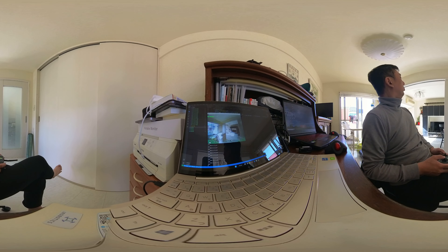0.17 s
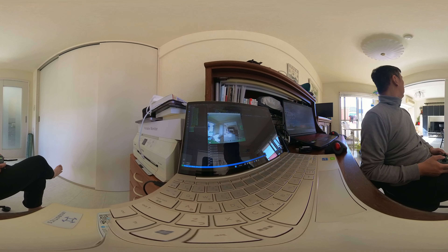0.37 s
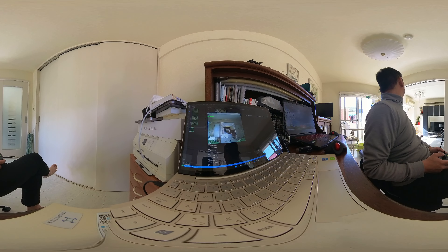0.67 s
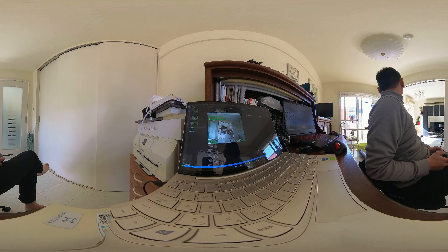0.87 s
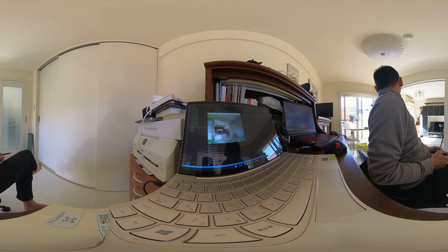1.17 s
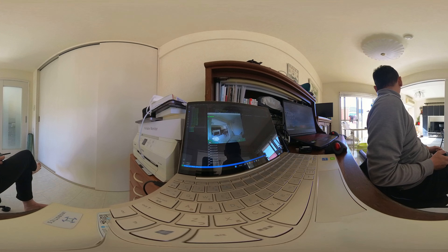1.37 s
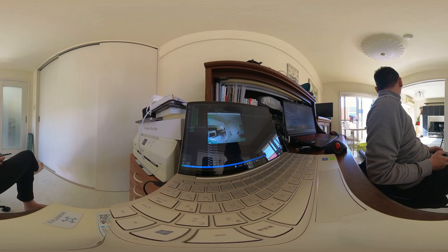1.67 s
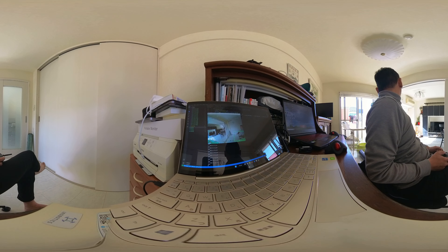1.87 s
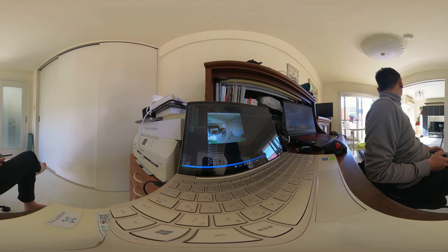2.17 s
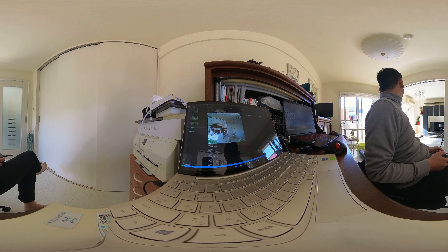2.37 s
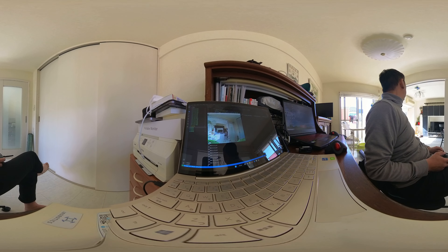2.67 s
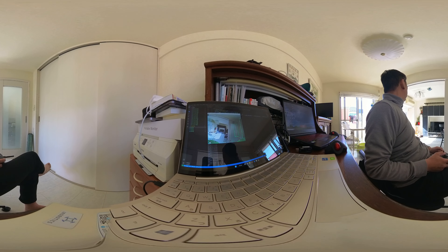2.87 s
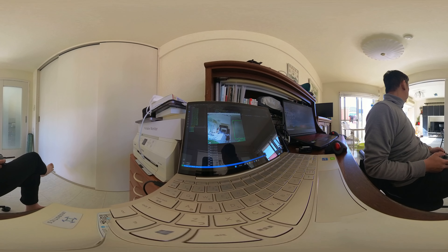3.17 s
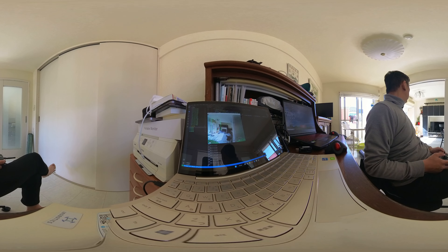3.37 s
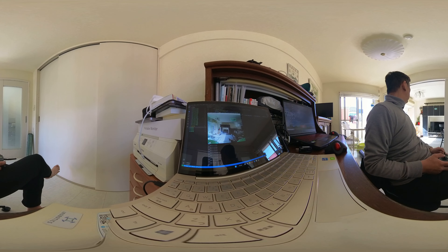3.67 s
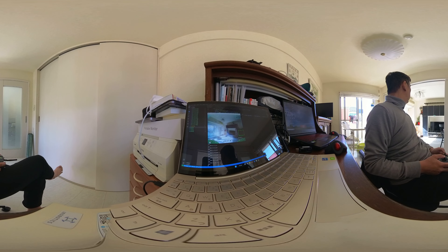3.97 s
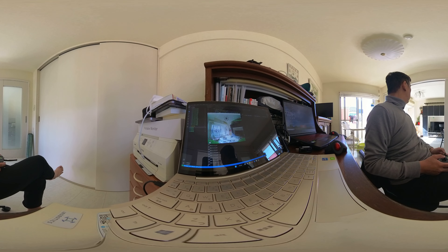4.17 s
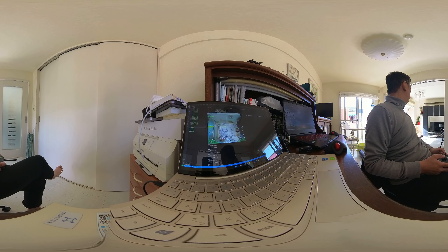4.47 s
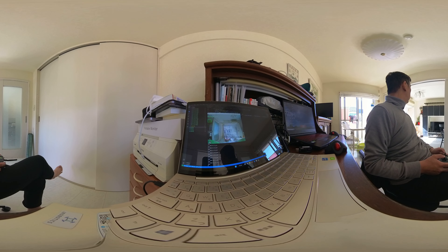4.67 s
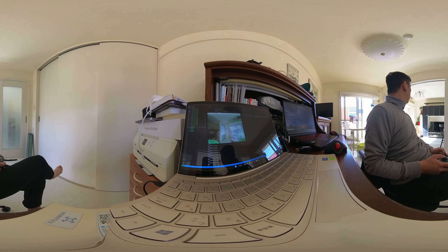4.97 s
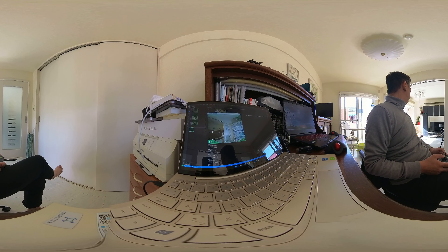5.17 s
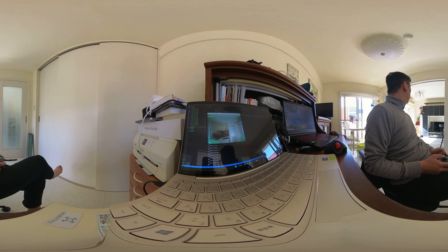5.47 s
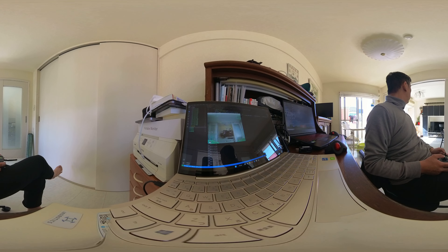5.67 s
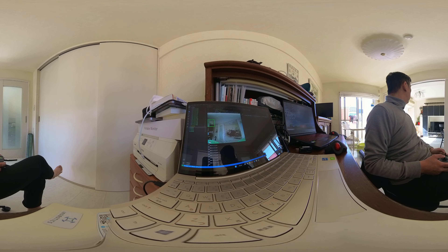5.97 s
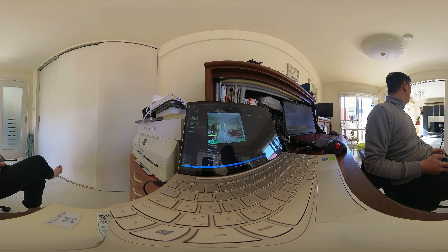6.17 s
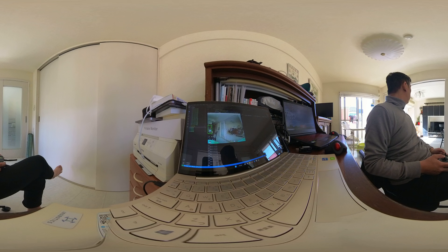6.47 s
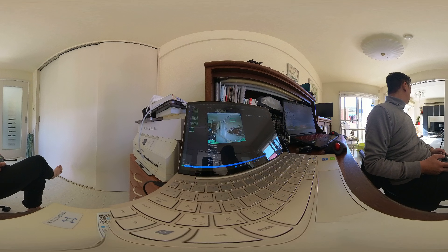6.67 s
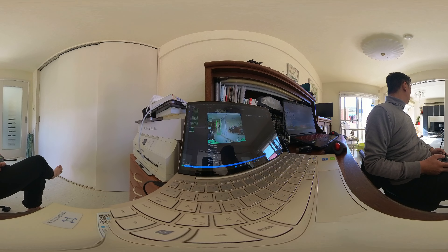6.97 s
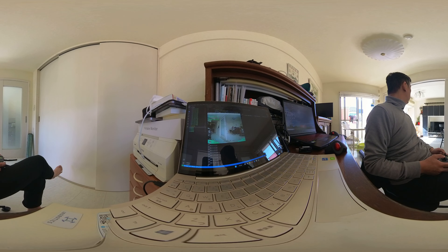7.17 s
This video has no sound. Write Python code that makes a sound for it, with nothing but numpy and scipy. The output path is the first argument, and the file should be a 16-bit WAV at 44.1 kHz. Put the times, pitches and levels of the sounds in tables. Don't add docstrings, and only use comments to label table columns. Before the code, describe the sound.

In a furnished room, a tiny drone flies continuously, four rotors singing slightly different high notes that beat and waver with the throttle. Bright propeller hiss surrounds the whine. One low puff of air hits the right side early on. The drone drifts away and fades, then edges closer. A stereo microphone on the desk also catches very faint soft bumps, short room echoes and low rumble.

```python
import sys
import numpy as np
from scipy import signal
from scipy.fft import rfft, irfft
from scipy.io import wavfile
from scipy.ndimage import uniform_filter1d

SR = 44100
rng = np.random.default_rng(int(sys.argv[2]) if len(sys.argv) > 2 else 0)


def wrap_up_sound(samples):
    columns = np.atleast_2d(samples).T
    tamed = np.clip(columns, -1, 1)
    steps = np.round(tamed * 32767).astype(np.int16)
    wavfile.write(sys.argv[1], SR, steps)


def gain_from_db(level_db):
    decades = np.asarray(level_db, float) / 20
    return 10 ** decades


N = 322812

BLADES = 3
HISS_DB = -5.5
# frequency in Hz, likeness from 0 to 1.
LIKENESS = [(60, 0.97), (200, 0.14), (450, 0.93), (1000, 0.7), (2000, 0.31), (3300, 0.033), (5000, 0.18),
            (6500, 0.17)]


def in_time(rows):
    seconds, *columns = np.transpose(rows)
    return np.array([np.interp(np.arange(N) / SR, seconds, column) for column in columns])


def at_hz(points, hz):
    point_hz, value = np.transpose(points)
    return np.interp(np.log(hz), np.log(point_hz), value)


def drift(rate_hz, count):
    step = 40
    r = np.exp(-2 * step * np.pi * rate_hz / SR)
    noise = rng.standard_normal((count, N // step + 2002))
    slow = signal.lfilter([1], [1, -2 * r, r * r], noise)[:, 2000:]
    slow = slow / slow.std(axis=1, keepdims=True)
    return np.array([np.interp(np.arange(N) / step, np.arange(len(s)), s) for s in slow])


def rotors(near_db):
    # start in seconds, pitch in Hz.
    throttle = [(0.0, 1526), (0.5, 1501), (0.73, 1368), (0.97, 1369), (1.2, 1548), (1.37, 1604),
                (1.69, 1580), (1.89, 1440), (2.56, 1500), (3.18, 1455), (3.4, 1368), (3.7, 1390),
                (4.21, 1563), (5.18, 1495), (5.45, 1377), (5.83, 1376), (6.26, 1487), (7.3, 1530)]
    # start in seconds, change in Hz.
    nose_down = [(0.0, 153), (0.18, 110), (0.29, 136), (1.36, 85), (1.52, 86), (1.64, 55), (2.55, 25),
                 (3.0, 36), (3.28, 77), (3.6, 45), (3.76, -15), (3.9, -18), (4.07, 3), (4.92, 26),
                 (6.01, 72.5), (6.11, 136), (6.46, 67), (7.299, 75)]
    # start in seconds, change in Hz.
    roll = [(0.0, 34), (0.17, 47.3), (0.829, 37.6), (1.24, 57), (1.83, 13.2), (2.73, 43), (2.82, 13.9),
            (3.38, 33.5), (3.55, 63), (3.6, 60), (3.69, 76.2), (3.85, 88.4), (4.09, 61), (4.23, 31.6),
            (6.31, 28.6), (6.6, 14.6), (6.99, 9.8), (7.301, 15)]
    # start in seconds, change in Hz.
    yaw = [(0.0, -16), (0.79, 35), (1.09, 28), (1.59, -6), (1.82, 1), (1.89, -21), (2.118, 11), (2.37, 7),
           (3.03, 31), (3.18, 3), (3.66, -8), (4.21, 28), (4.63, -12), (5.12, -23), (5.33, -0.5),
           (5.41, -22), (6.93, 1), (7.3, -3)]
    mixer = [
        [1, 1, 1, 1],
        [1, 1, -1, -1],
        [1, -1, 1, -1],
        [1, -1, -1, 1],
    ]
    commands = np.concatenate([in_time(c) for c in (throttle, nose_down, roll, yaw)])
    spin_up_s = .06
    commands = uniform_filter1d(commands, round(spin_up_s * SR), axis=1, mode="nearest")
    shaft_hz = np.array(mixer) @ commands / BLADES + 2.0 * drift(11.96, count=4)
    turns = np.cumsum(shaft_hz, axis=1) / SR + rng.random((4, 1))
    out = blade_tone(turns, near_db) + octave(turns, near_db)
    return out + twelfth(turns, shaft_hz, near_db) + unbalance(turns, shaft_hz, near_db)


def blade_tone(turns, near_db):
    mean_db = [
        [-55],
        [-55],
        [-55.5],
        [-53.5],
    ]
    # middle in seconds, gain in dB,
    # half length in seconds.
    lobes = [
        [(0.0, 10.5, 0.18), (1.24, 4.5, 0.046), (2.4, 5, 0.08), (2.72, -8, 0.089), (4.0, 9, 0.089),
         (4.68, -14, 0.13), (4.96, 3, 0.045), (6.8, -12, 0.084)],
        [(2.16, -7, 0.17), (2.92, -15, 0.057), (3.48, -10, 0.085), (4.64, 4.5, 0.12), (4.92, -14, 0.067),
         (5.36, -10, 0.051), (7.12, -10, 0.034)],
        [(0.0, -12, 0.066), (0.76, -2.5, 0.26), (2.32, 6, 0.05), (3.0, 6.5, 0.3), (4.08, 3, 0.31),
         (4.96, 12, 0.04), (5.96, -7, 0.22), (6.76, -12, 0.12)],
        [(0.28, -10, 0.42), (1.56, 5.5, 0.17), (2.76, -12, 0.054), (3.28, -9, 0.43), (5.0, 5, 0.047),
         (6.76, 7, 0.077), (7.04, -12, 0.08)],
    ]
    level_db = beam(mean_db, 1.1, lobes, near_db)
    return tone(BLADES * turns, 1140, level_db, flutter_db=3.0, blur=0.19)


def octave(turns, near_db):
    mean_db = [
        [-57],
        [-56],
        [-54.5],
        [-53],
    ]
    # middle in seconds, gain in dB,
    # half length in seconds.
    lobes = [
        [(0.08, 3, 0.08), (2.56, -5, 0.42), (2.88, 4.5, 0.089), (4.84, -8, 0.05), (5.68, 10, 0.079),
         (6.24, 6, 0.18), (6.8, -14, 0.081), (7.12, 9, 0.098)],
        [(0.44, 11.5, 0.12), (2.08, -9, 0.27), (2.12, 13, 0.05), (2.64, 11, 0.05), (2.88, -5, 0.082),
         (4.52, 8.5, 0.12), (4.92, -9, 0.049), (5.68, -14, 0.18), (6.72, 5.5, 0.26), (7.16, -14, 0.041)],
        [(0.0, 7.5, 0.053), (0.64, -10, 0.046), (2.88, 5.5, 0.31), (4.08, 8, 0.06), (4.68, -15, 0.05),
         (5.24, -6, 0.1), (7.32, -4, 0.12)],
        [(0.2, -9, 0.18), (1.8, -5, 0.18), (4.84, 4.5, 0.19), (6.76, 13, 0.079), (7.0, -6, 0.089)],
    ]
    level_db = beam(mean_db, 1, lobes, near_db)
    return tone(2 * BLADES * turns, 3000, level_db, flutter_db=3.0, blur=.8)


def twelfth(turns, shaft_hz, near_db):
    mean_db = [
        [-62.0],
        [-58],
        [-60.5],
        [-58.5],
    ]
    # middle in seconds, gain in dB,
    # half length in seconds.
    lobes = [
        [(0.12, 8, 0.27), (6.48, 11, 0.12)],
        [(0.28, 9, 0.12), (0.84, -13, 0.16), (4.08, 10, 0.12), (6.88, 5, 0.18)],
        [(3.12, 7, 0.41), (4.08, 9.5, 0.16), (4.92, 6, 0.056), (5.52, -5, 0.27), (7.12, 11, 0.13)],
        [(0.52, -2, 0.4), (2.36, 3, 0.12), (3.96, 7, 0.14), (5.04, 5, 0.11), (6.72, 7, 0.12)],
    ]
    notch_hz, notch_width_hz = 3750, 260
    notch_db = -9 * np.exp(-((3 * BLADES * shaft_hz - notch_hz) / notch_width_hz) ** 2)
    level_db = beam(mean_db, 0.66, lobes, near_db) + notch_db
    return tone(3 * BLADES * turns, 4500, level_db, flutter_db=3.5, blur=1.1)


def unbalance(turns, shaft_hz, near_db):
    # multiple of shaft speed, level in dB when the hiss is at the reference.
    weak = [(1, -70.5), (2, -73.5)]
    chipped_db = [
        [1],
        [-1],
        [-2],
        [-5],
    ]
    frame_hz, frame_width_hz = 503, 55
    reference_db = -44
    ring_db = -10 * np.log10(1 + ((shaft_hz - frame_hz) / frame_width_hz) ** 4)
    out = 0
    for multiple, db in weak:
        swell_db = 2.0 * drift(1.2, count=4)
        if multiple == 1:
            swell_db = swell_db + ring_db + chipped_db
        level_db = db + near_db + HISS_DB - reference_db + swell_db
        out = out + tone(multiple * turns, 500 * multiple, level_db, flutter_db=1.5, blur=.15)
    return out


def beam(mean_db, follows, lobes, near_db):
    t = np.arange(0, N, 100) / SR
    swells = []
    for rotor in lobes:
        swell = sum(db * np.exp(-.5 * ((t - s) / width) ** 2) for s, db, width in rotor)
        swells.append(np.interp(np.arange(N) / SR, t, swell))
    usual_near_db = -39
    distance_db = follows * (near_db - usual_near_db)
    fading_db = 1.5 * drift(3.0, count=4)
    return mean_db + distance_db + fading_db + np.array(swells)


def tone(cycles, hz, level_db, flutter_db, blur):
    phase = 2 * np.pi * cycles + blur * drift(20.2, count=4)
    mid = gain_from_db(flutter_db * drift(20.7, count=4)) * np.sin(phase)
    alike = np.clip(at_hz(LIKENESS, hz), 0, 1)
    a, b = drift(4.5, count=4), drift(3.7, count=4)
    side = np.sqrt((1 - alike) / (1 + alike) / 2) * (a * np.sin(phase) + b * np.cos(phase))
    gain = np.sqrt(2) * gain_from_db(level_db)
    mid, side = np.sum(gain * mid, axis=0), np.sum(gain * side, axis=0)
    return np.array([mid + side, mid - side])


def hiss(level_db, top_db, low_db):
    # frequency in Hz, level in dB per Hz.
    colour = [(290, -28), (480, -14.5), (620, -16), (760, -17), (1050, -12.5), (1900, -7.5), (2900, -3.5),
              (3600, -3.5), (4500, -1), (6500, -2.5), (11300, -0.5), (12600, -8.5), (14000, -15),
              (15500, -23)]
    hz, pair = coloured(colour)
    scale = np.sqrt(np.mean(irfft(pair * ((hz > 5200) & (hz < 7000)), N) ** 2))
    centres = np.arange(7.5, 14.5, .5)
    together, own = drift(28.0, count=1), drift(16.0, count=len(centres))
    out = 0
    for centre, gust in zip(centres, own):
        band = np.clip(1 - 2 * abs(np.log2(hz) - centre), 0, 1)
        dulled = np.clip(2 * (centre - 12.5), 0, 1) * (top_db - top_db.mean())
        thinned = np.clip(10.5 - centre, 0, 1) * (low_db - low_db.mean() + 1.6 * gust)
        gusting = 0.27 * together + 0.45 * gust
        out = out + gain_from_db(level_db + dulled + thinned + gusting) * irfft(pair * band, N)
    return out / scale


def coloured(spectrum):
    hz = np.fft.rfftfreq(N, 1 / SR) + 1
    mid, side = rfft(rng.standard_normal((2, N)))
    alike = np.clip(at_hz(LIKENESS, hz), 0, 1)
    pair = np.sqrt(1 + alike) * mid + np.sqrt(1 - alike) * side * [[1], [-1]]
    return hz, gain_from_db(at_hz(spectrum, hz)) * pair


def puff():
    # start in seconds, peak in dB, swing in Hz, rise in seconds.
    gulps = [
        (.8035, -30, 62, .017),
        (.8362, -27, 106.4, 0.005),
    ]
    return swings(gulps, sharp=1.8) * gain_from_db(np.array([[-32.0], [0]]))


def bumps():
    # start in seconds, peak in dB.
    knocks = [(.03, -57), (.31, -60), (.62, -58), (4.26, -59), (4.601, -60), (6.24, -58), (6.801, -61),
              (7.169, -57)]
    return swings([(s, db, 55, .018) for s, db in knocks], sharp=1.1)


def swings(rows, sharp):
    t, out = np.arange(N) / SR, 0
    for s, db, hz, rise_s in rows:
        age = np.clip(t - s, 0, 1) / rise_s
        swell = (age * np.exp(1 - age)) ** sharp
        out = out - gain_from_db(db) * swell * np.sin(2 * np.pi * hz * (t - s))
    return out


def rumble():
    # frequency in Hz, level in dB per Hz.
    colour = [(12, -30), (20, -12), (49, -1), (65, -2), (81, -7), (113, -0.5), (221, -19.5), (330, -18.5),
              (430, -55), (730, -120)]
    hz, pair = coloured(colour)
    noise = irfft(pair * (hz < 500), N)
    return gain_from_db(-70 + 3.0 * drift(5.2, count=1)) * noise / noise.std()


def room(x):
    t60_s, echo_db = .35, -9
    t = np.arange(round(t60_s * SR)) / SR
    tail = rng.standard_normal((2, len(t))) * gain_from_db(-60 * t / t60_s) * (t > .006)
    tail = tail / np.sqrt(np.sum(tail ** 2, axis=1, keepdims=True))
    return x + gain_from_db(echo_db) * signal.fftconvolve(x, tail, axes=1)[:, :N]


def scene():
    # start in seconds, level in dB.
    near = [(0.0, -33), (0.33, -36.5), (0.41, -35), (0.92, -37.5), (1.45, -35.5), (1.94, -38.5),
            (2.87, -36), (3.71, -40), (4.22, -40.5), (4.59, -42), (5.59, -43.5), (6.38, -41), (6.75, -42),
            (6.77, -41), (7.32, -40)]
    # start in seconds, lift of the treble in dB.
    facing = [(0, -1), (.28, 0), (.5, 1.5), (1.8, 2.0), (2.9, 1), (3.8, -0.5), (5.5, -0.5), (6.05, -1),
              (6.3, -0.5), (7.32, 0.3)]
    (near_db,), (top_db,) = in_time(near), in_time(facing)
    hiss_db = near_db + HISS_DB - 0.55 * (top_db - top_db.mean())
    air = hiss(hiss_db, top_db, low_db=0.17 * near_db)
    return room(rotors(near_db)) + air + rumble() + bumps() + puff()


def shared_treble(x):
    frame, offset, bins = 1024, 560, 32
    shared_hz, ragged_hz, top_hz = 6890, 12400, 15250
    frames = dict(fs=SR, window="cosine", nperseg=2 * frame, noverlap=frame)
    hz, _, (left, right) = signal.stft(np.pad(x, ((0, 0), (frame - offset, 0))), **frames)
    band = np.arange(len(hz)) // bins
    pan, flip, starve = rng.standard_normal((3, band[-1] + 1, left.shape[1] + 1))
    pan = np.round(0.66 * (pan[:, 1:] + pan[:, :-1]))[band]
    sign = np.where(flip[:, 1:] + .25 * flip[:, :-1] > 1.05, -1, 1)[band]
    treble = (hz >= shared_hz)[:, None]
    right = np.where(treble, sign * gain_from_db(1.16 * pan) * left, right)
    left = np.where(treble, gain_from_db(-.8 * pan) * left, left)
    hunger = np.clip((hz - ragged_hz) / (top_hz - ragged_hz), 0, 1)[:, None]
    kept = starve[band, 1:] > 3.0 * hunger - 1.7
    kept = np.where(hunger > 0, kept & (hunger < 1), True)
    out = signal.istft(np.array([left, right]) * kept, **frames)[1]
    return out[:, frame - offset:frame - offset + N]


def band_limit(x):
    return signal.sosfilt(signal.butter(12, 15610, fs=SR, output="sos"), x)


def record(dry):
    ports = dry * gain_from_db(np.array([[-.2], [.2]]))
    return band_limit(shared_treble(ports))


dry = scene()
out = record(dry)
wrap_up_sound(out)
```